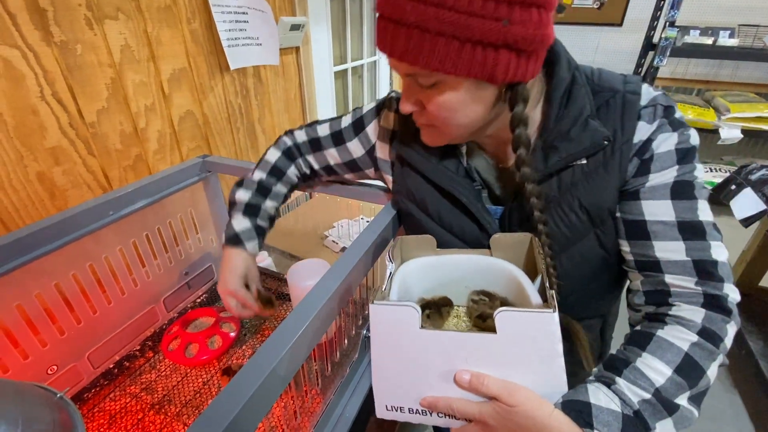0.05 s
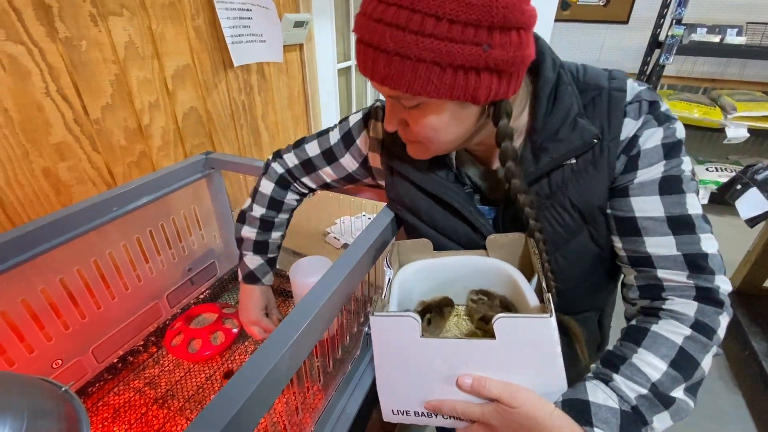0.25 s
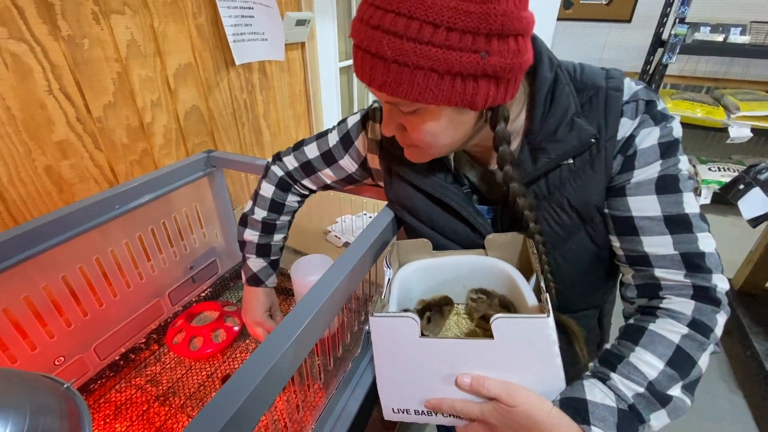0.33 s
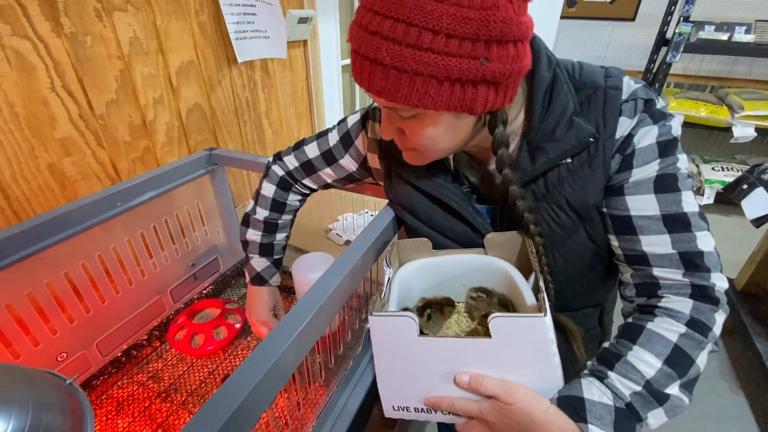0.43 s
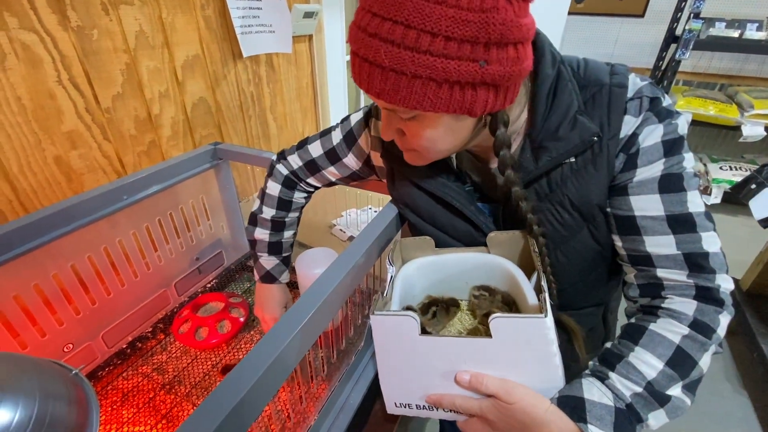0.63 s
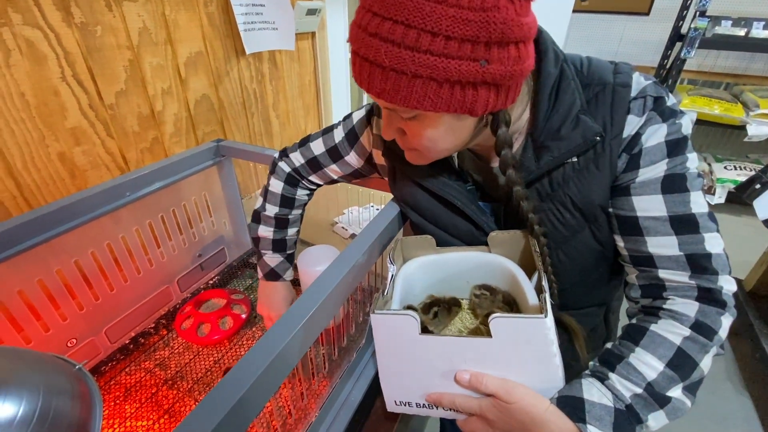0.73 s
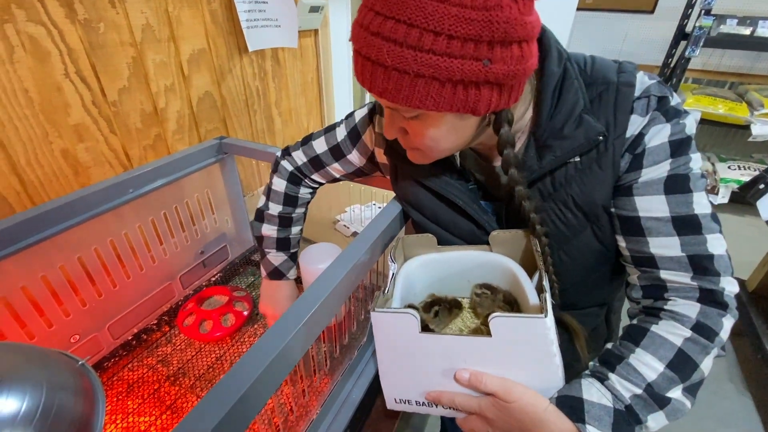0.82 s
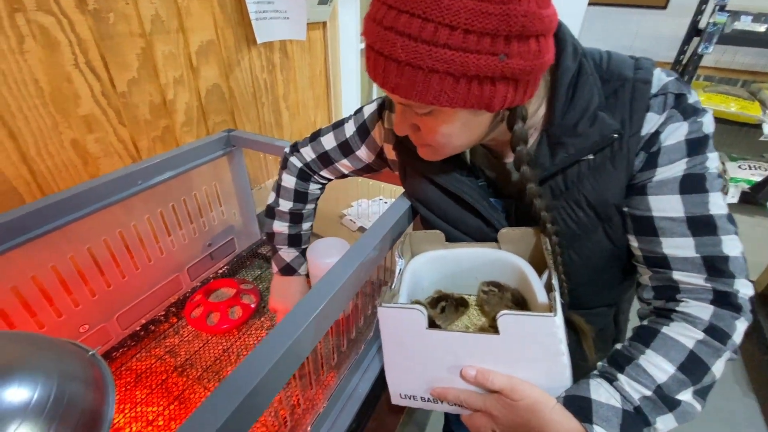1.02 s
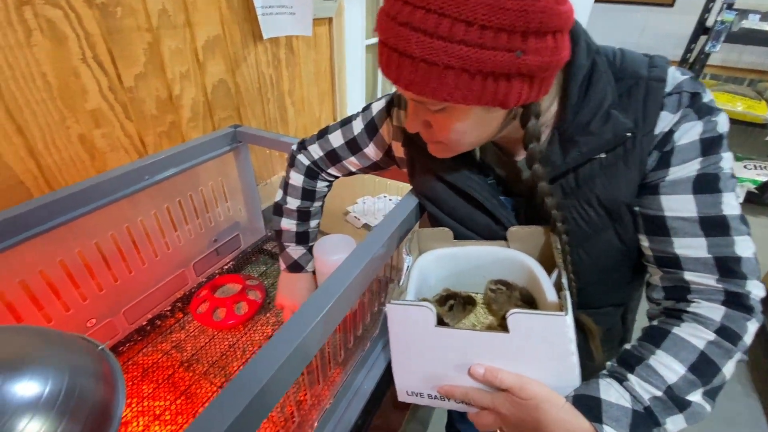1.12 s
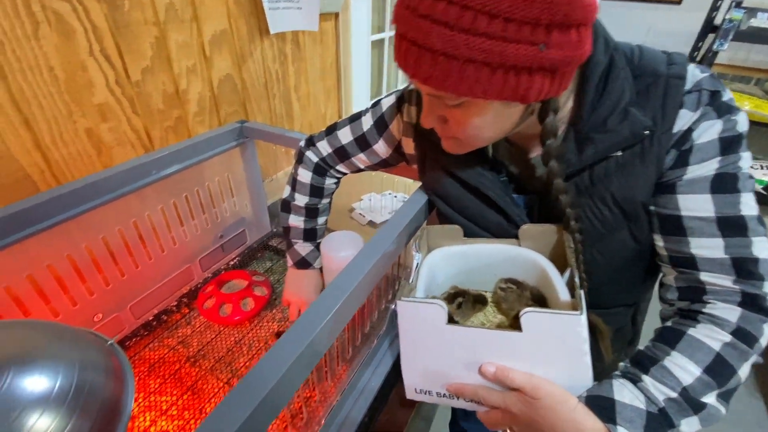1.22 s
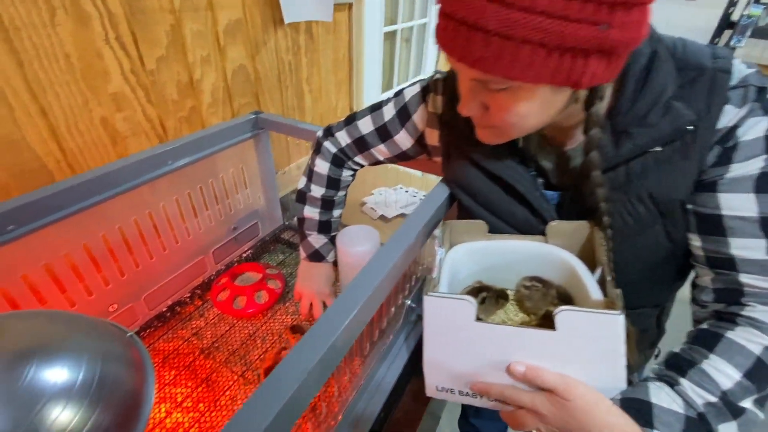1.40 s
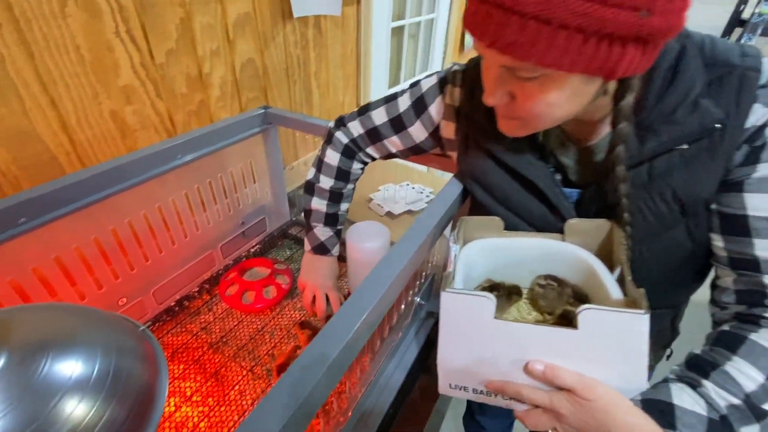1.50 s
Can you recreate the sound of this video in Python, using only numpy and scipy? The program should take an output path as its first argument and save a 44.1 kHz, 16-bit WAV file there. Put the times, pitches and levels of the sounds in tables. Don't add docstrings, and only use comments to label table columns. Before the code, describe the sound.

Several close chicks call in overlapping high peeps, first short falling notes, then two longer, louder cries, then softer ones; a distant flock, low air rumble, faint cloth rub and light box taps surround them indoors.

```python
import sys
import numpy as np
from scipy import signal
from scipy.fft import rfft, irfft
from scipy.io import wavfile
from scipy.ndimage import uniform_filter1d

SR = 44100
rng = np.random.default_rng(int(sys.argv[2]) if len(sys.argv) > 2 else 0)


def to_linear_factor(level_db):
    exponent = np.asarray(level_db, float) / 20
    return 10 ** exponent


def persist_wave(psi):
    counts = np.round(np.clip(psi, -1, 1) * 32767).astype(np.int16)
    wavfile.write(sys.argv[1], SR, np.atleast_2d(counts).T)


N = 68355


def evened(x):
    return x / np.sqrt(np.mean(x ** 2) + 1e-20)


def add(mix, start_s, sound):
    part = mix[max(round(start_s * SR), 0):][:len(sound)]
    part += sound[:len(part)]


def drift(n, size):
    smoothed = uniform_filter1d(rng.standard_normal(n), size)
    return evened(uniform_filter1d(smoothed, size))


def coloured(points):
    point_hz, point_db = np.transpose(points)
    hz = np.fft.rfftfreq(N, 1 / SR)
    shape_db = np.interp(np.log(hz + 1), np.log(point_hz), point_db, left=-60, right=-60)
    return evened(irfft(rfft(rng.standard_normal(N)) * to_linear_factor(shape_db), N))


def resonate(x, hz, width_hz):
    turn = np.exp(2j * np.pi * hz * np.arange(len(x)) / SR)
    r = np.exp(-np.pi * width_hz / SR)
    return 2 * (turn * signal.lfilter([1 - r], [1, -r], x / turn)).real


def whistle(hz, db, bright_db):
    overtones_db = [-61.5, -76]
    reference_db, overtone_growth = -26.5, 0.7
    n = len(hz)
    jittered_hz = hz * (1 + 0.0005 * drift(n, size=60))
    phase = 2 * np.pi * np.cumsum(jittered_hz) / SR
    glide = np.minimum(abs(np.gradient(hz)) * SR / 40000, 1)
    flutter_db = 0.6 + 1.2 * glide
    effort_db = overtone_growth * (db - reference_db)
    tone = to_linear_factor(db + flutter_db * drift(n, size=90)) * np.sin(phase)
    for partial, over_db in enumerate(overtones_db + np.asarray(bright_db), start=2):
        patchy_db = over_db + effort_db + 4.5 * drift(n, size=700)
        audible = partial * hz < 15800
        tone += to_linear_factor(patchy_db) * np.sin(partial * phase) * audible
    t = np.arange(n) / SR
    soft_edges = np.clip(np.minimum(t, t[-1] - t) / 0.0025, 0, 1)
    return np.sqrt(2) * tone * soft_edges


def peep(start, length, top_hz, end_hz, db, bend, peak, bright_db=0.):
    onset_dip, onset_s = 0.0203, 0.0152
    t = np.arange(0, length, 1 / SR)
    u = t / length
    falling_hz = top_hz - (top_hz - end_hz) * u ** bend
    hz = falling_hz * (1 - onset_dip * np.exp(-t / onset_s))
    skew = np.log(.5) / np.log(np.clip(peak, .1, .9))
    swell = np.sin(np.pi * u ** skew) ** 0.68
    return start, swell * whistle(hz, db, bright_db)


def traced_peep(rows, bright_db, dips=()):
    s, row_hz, row_db = np.transpose(rows)
    t = np.arange(s[0], s[-1], 1 / SR)
    hz = uniform_filter1d(np.interp(t, s, row_hz), size=100, mode="nearest")
    db = uniform_filter1d(np.interp(t, s, row_db), size=100, mode="nearest")
    for at, dip_hz, dip_db, half_width in dips:
        bell = np.exp(-((t - at) / half_width) ** 2)
        hz = hz - dip_hz * bell
        db = db + dip_db * bell
    return s[0], whistle(hz, db, bright_db)


def shop():
    # (frequency [Hz], level [dB per Hz])
    rumble_points = [(30, -52.5), (60, -2), (85, 2), (110, -2), (160, -3.5), (400, -25), (1200, -26.5),
                     (2300, -33.5)]
    # (frequency [Hz], level [dB per Hz])
    hiss_points = [(2000, -14), (5000, -6), (7500, -9.5), (10000, -17), (12500, -13.5), (15500, -24)]
    # (pitch [Hz], width [Hz], level [dB])
    motor_hums = [(109, 17, -55.5), (126.3, 8.8, -62.5), (283.2, 12.6, -66.5)]
    t = np.arange(N) / SR
    out = to_linear_factor(-53.5 - 3 * t + 1.2 * drift(N, size=3000)) * coloured(rumble_points)
    out += to_linear_factor(-62.5 - 5 * t + 0.86 * drift(N, size=1500)) * coloured(hiss_points)
    for hz, width_hz, db in motor_hums:
        out += to_linear_factor(db) * evened(resonate(rng.standard_normal(N), hz, width_hz))
    return out


def flock():
    count, spread_db, room_t60 = 70, 5.5, .55
    pad = SR // 2
    far = np.zeros(N + pad)
    for k, (when, size, pitch, effort) in enumerate(rng.random((count, 4))):
        start = (k + when) / count * len(far) / SR
        top_hz = 4525 * (.85 + 0.3 * pitch)
        end_hz = 2900 * (.85 + 0.258 * size)
        db = spread_db * 2 * effort
        add(far, *peep(start, 0.038 + 0.062 * size, top_hz, end_hz, db, bend=6.7, peak=0.83))
    tail = rng.standard_normal(pad) * to_linear_factor(-60 * np.arange(pad) / SR / room_t60)
    blurred = evened(signal.fftconvolve(far, tail)[pad:pad + N])
    return to_linear_factor(-51.5 - 6 * np.arange(N) / SR) * blurred


def sliding_chicks():
    # (start [s], length [s], top [Hz], end [Hz])
    slides = [(0, .013, 2900, 2650), (.1, .13, 4150, 3450), (.258, .045, 2800, 2450),
              (.317, .018, 5900, 4600), (.435, .04, 3300, 2800), (.47, .057, 4350, 3250),
              (.643, .04, 3350, 2800), (.905, .016, 4500, 4700), (.915, .047, 3800, 2750),
              (.93, .075, 4000, 2850), (1.049, .011, 2550, 3300), (.368, .033, 3900, 2900),
              (.262, .115, 3800, 3900)]
    slide_levels = [-39, -49.5, -57.5, -45.5, -52, -44, -52.5, -36.5, -41.5, -47, -46, -37.5, -52]
    slide_brightness = [13.5, -12, -8, -10, -8, -12, -6, -21, 16.5, -13, 19, 13.5, -12.5]
    out = np.zeros(N)
    for row, db, bright_db in zip(slides, slide_levels, slide_brightness):
        add(out, *peep(*row, db, bend=1.6, peak=0.49, bright_db=bright_db))
    return out


def near_chicks():
    # (time [s], pitch [Hz], level [dB])
    first_calls = [
        [(.085, 4780, -40.5), (.103, 5133, -51), (.12, 4860, -38), (.163, 4580, -34.5), (.177, 4150, -39.5),
         (.184, 3640, -34.5), (.193, 3130, -53.5)],
        [(.15, 5160, -88), (.205, 5364, -34.5), (.25, 5353, -31.5), (.274, 5470, -35.5), (.285, 4860, -20),
         (.301, 4000, -27), (.309, 3310, -36), (.323, 2894, -34), (.336, 2040, -60.5)],
        [(.328, 5150, -42), (.339, 5400, -41), (.347, 4896, -30.5), (.37, 4770, -24.5), (.402, 4683, -28),
         (.431, 4440, -19), (.446, 4124, -31), (.466, 3640, -33), (.484, 2650, -44)],
        [(0.488, 5061, -41), (0.51, 5360, -59), (0.53, 4780, -40), (0.56, 4647, -35.5), (0.584, 3950, -31),
         (0.606, 2903, -46)],
    ]
    # (time [s], pitch [Hz], level [dB])
    loud_calls = [
        [(0.598, 4600, -53), (0.624, 5230, -33.5), (0.66, 5478, -28.5), (.7, 5638, -29.5), (0.735, 5587, -31.5),
         (.75, 5622, -23.5), (0.786, 5536, -25.5), (0.801, 5516, -25.5)],
        [(0.8, 5200, -45), (.805, 5185, -18.5), (.823, 5190, -20), (.832, 4700, -20), (0.84, 4014, -27),
         (0.848, 4110, -30), (0.859, 3765, -25.5), (0.875, 2254, -43)],
        [(0.925, 4900, -66), (0.955, 4670, -43.5), (.975, 4690, -45.5), (.988, 4590, -32), (1.007, 4513, -23.5),
         (1.022, 4392, -25.5), (1.035, 4395, -32.5), (1.072, 3080, -45.5)],
        [(1.057, 3400, -48), (1.064, 4600, -38), (1.076, 5135, -21.5), (1.098, 5376, -28.5), (1.14, 5346, -28),
         (1.174, 5275, -24), (1.2, 5267, -27.5)],
    ]
    # (time [s], pitch [Hz], level [dB])
    late_calls = [
        [(1.2, 5450, -33), (1.248, 5104, -27.5), (1.26, 4700, -27.5), (1.268, 3877, -16.5),
         (1.276, 3510, -27.5), (1.286, 2685, -55)],
        [(1.09, 4620, -55), (1.11, 4640, -40), (1.125, 4400, -60), (1.14, 4090, -32), (1.16, 3930, -51.5),
         (1.173, 3574, -29.5), (1.192, 2850, -62)],
        [(1.158, 4950, -39.5), (1.2, 3644, -30.5), (1.22, 2730, -56.5)],
        [(1.195, 3840, -50), (1.24, 4020, -48), (1.295, 3887, -47.5), (1.315, 4020, -43.5),
         (1.335, 3800, -40.5), (1.362, 3490, -36.5), (1.39, 2710, -59.5)],
        [(1.333, 5010, -46), (1.352, 5090, -47), (1.378, 4745, -53), (1.404, 4005, -34.5), (1.43, 3240, -38.5),
         (1.442, 2900, -49.5)],
    ]
    # (second partial [dB], third partial [dB])
    call_brightness = [(9, -2), (3, 3), (2, -3), (4, -2), (5, 7), (-18, -18), (-18, -8), (-5, -18),
                       (-6, -18), (1, -6), (7, 1)]
    # (time [s], pitch dip [Hz], level change [dB], half width [s])
    pitch_level_dips = [(.28, 3, -18, 0.0017), (.291, 7, -11, 0.0022), (.301, -8, 3, 0.0018),
                        (.305, 3, 1.5, 0.0014), (.413, 38.5, -12, 0.0068), (.441, -2, 0.5, .002),
                        (.779, 183, 2.5, 0.0038), (.806, 201, 0, 0.0079), (.829, -9, -4, 0.0014),
                        (.834, -5, -6.5, 0.00068), (.838, 243.5, -0.5, 0.0045), (.853, -9, -17, 0.0019),
                        (1.127, 23.5, -12, 0.0054), (1.156, -12.5, -14, 0.0037), (1.17, 79, -1, 0.0048),
                        (1.216, -16, -3, 0.0056), (1.226, 94, 2, 0.0019), (1.233, 202, -2, 0.004),
                        (1.254, 5, -13, .002), (1.261, -6, -6, .0015), (1.266, 150, -10.5, 0.0032)]
    long_calls = [loud_calls[0] + loud_calls[1][1:], loud_calls[3] + late_calls[0][1:]]
    calls = first_calls + loud_calls[2:3] + late_calls[1:] + long_calls
    out = np.zeros(N)
    for k, (rows, bright_db) in enumerate(zip(calls, call_brightness)):
        smooth_voice = k in range(4, 9)
        add(out, *traced_peep(rows, bright_db, () if smooth_voice else pitch_level_dips))
    return out


def half_hidden_chicks():
    # (time [s], pitch [Hz], level [dB])
    hidden_calls = [
        [(.268, 5650, -58), (.292, 6300, -54), (.33, 6070, -55), (.365, 5650, -53), (.374, 5050, -50),
         (.381, 4250, -52)],
        [(.376, 4130, -40), (.382, 3790, -30.5), (.4, 3700, -36.5), (.412, 3480, -38), (.422, 3180, -34),
         (.432, 2450, -52)],
        [(.822, 6260, -59), (.86, 5860, -52), (.895, 5640, -67), (.912, 5000, -48), (.921, 3870, -42)],
        [(.864, 3960, -50), (.882, 3930, -36.5), (.892, 4000, -48.5), (.898, 3590, -41), (.918, 3280, -47),
         (.935, 2760, -49)],
        [(1.415, 5270, -60), (1.43, 5800, -54.5), (1.445, 5880, -54.5), (1.47, 5680, -52), (1.5, 5430, -57),
         (1.51, 5700, -49), (1.518, 5700, -56)],
        [(1.504, 5540, -56), (1.512, 4960, -41), (1.517, 3740, -49), (1.524, 3650, -44), (1.54, 3460, -42.5),
         (1.552, 3155, -44.5)],
        [(1.514, 4850, -60), (1.526, 5700, -57), (1.536, 6300, -52), (1.548, 5240, -70)],
    ]
    hidden_brightness = [-5, 3, -4, 5, -2, 4, -15]
    out = np.zeros(N)
    for rows, bright_db in zip(hidden_calls, hidden_brightness):
        add(out, *traced_peep(rows, bright_db))
    return out


def room(x, t60):
    at = np.arange(300, SR // 2 - 20, 20)
    reflections = np.zeros(SR // 2)
    signs = rng.choice([-1., 1.], len(at))
    reflections[at + rng.integers(0, 20, len(at))] = signs * to_linear_factor(-60 * at / SR / t60)
    return signal.fftconvolve(x, reflections / np.linalg.norm(reflections))[:N]


def chicks():
    # (delay [s], level [dB])
    box_echoes = [(.0021, -20.5), (.0047, -22), (.0083, -15.5), (0.014, -25)]
    voices = sliding_chicks() + near_chicks() + half_hidden_chicks()
    out = voices + to_linear_factor(-20) * room(voices, t60=0.29)
    for delay, db in box_echoes:
        add(out, delay, to_linear_factor(db) * voices)
    return out


def feet():
    # (time [s], level [dB])
    foot_ticks = [(.002, -53), (.029, -72), (.386, -63.5), (1.092, -59.5), (1.11, -62.5), (1.118, -45.5),
                  (1.223, -58.5), (1.259, -51), (1.271, -67), (1.326, -62.5), (1.416, -58)]
    out = np.zeros(N)
    t = np.arange(3000) / SR
    for at, db in foot_ticks:
        bright_noise = np.diff(rng.standard_normal(len(t) + 1))
        add(out, at, bright_noise * to_linear_factor(db - 60 * t / 0.015))
    return out


def box_taps():
    # (time [s], ring pitch [Hz], ring t60 [s])
    finger_taps = [
        (.632, 1050, .05),
        (.648, 530, .09),
        (.808, 1100, .03),
        (1.228, 900, .02),
        (1.253, 600, .03),
        (1.261, 750, .02),
        (1.27, 900, .02),
        (1.305, 680, .06),
    ]
    # (ring [dB], click [dB])
    tap_levels = [(-58, -66), (-54, -70), (-58, -57), (-64, -58), (-53, -55), (-54, -44), (-60, -56),
                  (-59, -63)]
    out = np.zeros(N)
    t = np.arange(3000) / SR
    dull = signal.butter(3, 3000, fs=SR, output="sos")
    for (at, hz, t60), (ring_db, click_db) in zip(finger_taps, tap_levels):
        click = evened(signal.sosfilt(dull, rng.standard_normal(len(t))))
        click = click * to_linear_factor(click_db - 60 * t / .015)
        ring = to_linear_factor(ring_db - 60 * t / t60) * np.sin(2 * np.pi * hz * t)
        add(out, at, click + ring)
    return out


def sleeve():
    # (time [s], level [dB])
    rub_levels = [
        (0.861, -70.5),
        (0.876, -79),
        (0.964, -63),
        (1.142, -64.5),
        (1.2, -86.5),
    ]
    s, db = np.transpose(rub_levels)
    noise = rng.standard_normal(N)
    rim_hz, rim_width_hz = 1274, 150
    once = resonate(noise, rim_hz, rim_width_hz)
    rub = evened(resonate(once, rim_hz, rim_width_hz))
    rub += to_linear_factor(-2.5) * evened(resonate(noise, 1100, 840))
    return rub * to_linear_factor(np.interp(np.arange(N) / SR, s, db, left=-110, right=-110))


def masked(x):
    limit_start_db, limit_db_per_khz, depth_db = -43.5, -3.2, -36
    hz, _, z = signal.stft(x, SR, window="blackmanharris", nperseg=1024, noverlap=768)
    power = abs(z) ** 2
    loudest_hz = hz[power.argmax(1)]
    above_khz = (hz[:, None] - loudest_hz[:, None]) / 1000
    loudest_db = 10 * np.log10(power.max(1, keepdims=True) + 1e-20)
    limit_db = loudest_db + limit_start_db + limit_db_per_khz * above_khz
    nearby = uniform_filter1d(uniform_filter1d(power, size=9, axis=1), size=3, axis=2)
    band_db = 10 * np.log10(abs(nearby) + 1e-20)
    hidden = (above_khz > 0) / (1 + np.exp(np.clip(band_db - limit_db, -30, 30)))
    gain = to_linear_factor(depth_db * hidden)
    return signal.istft(z * gain, SR, window="blackmanharris", nperseg=1024, noverlap=768)[1][:, :N]


def scene():
    return (shop() + flock() + chicks() + feet() + box_taps() + sleeve())[None]


def band_limit(x):
    return signal.sosfilt(signal.butter(12, 15830, fs=SR, output="sos"), x)


def record(dry):
    mix = masked(dry)
    return band_limit(mix)


dry = scene()
out = record(dry)
persist_wave(out)
```